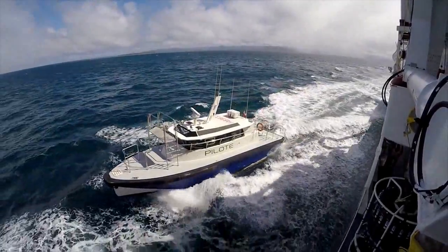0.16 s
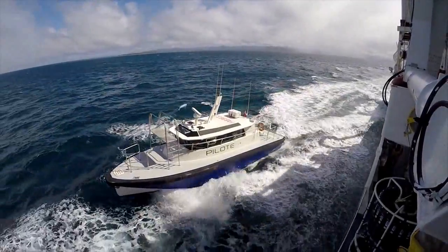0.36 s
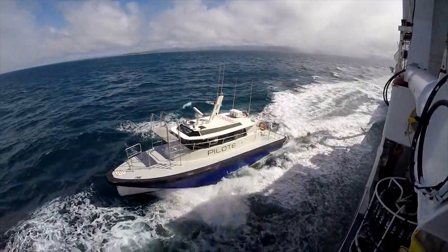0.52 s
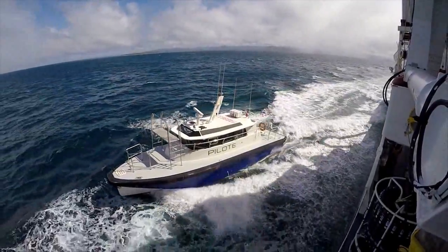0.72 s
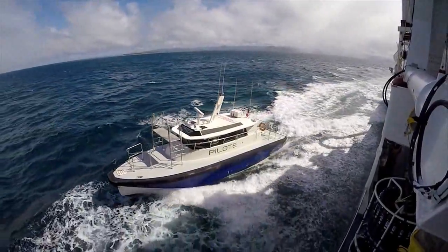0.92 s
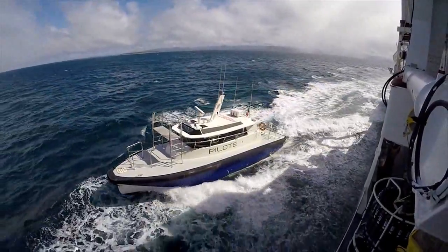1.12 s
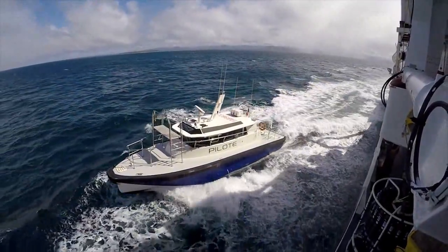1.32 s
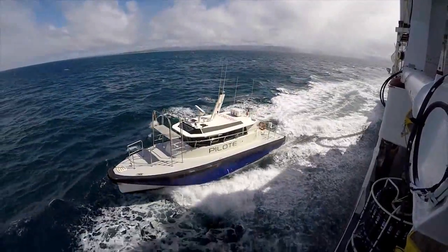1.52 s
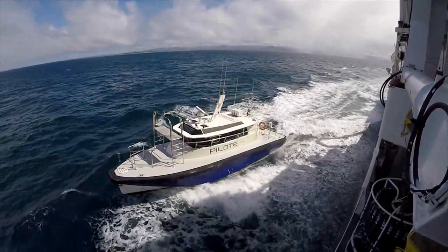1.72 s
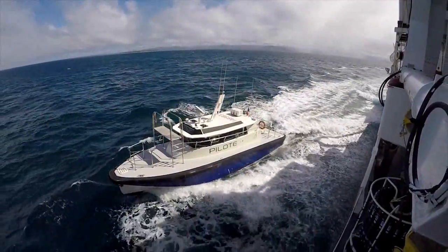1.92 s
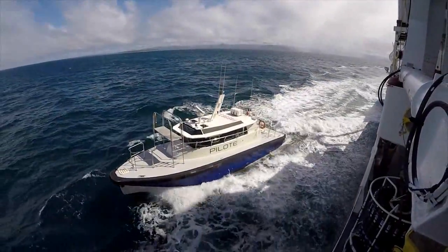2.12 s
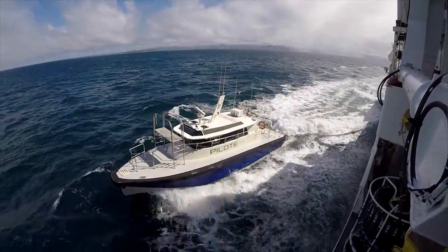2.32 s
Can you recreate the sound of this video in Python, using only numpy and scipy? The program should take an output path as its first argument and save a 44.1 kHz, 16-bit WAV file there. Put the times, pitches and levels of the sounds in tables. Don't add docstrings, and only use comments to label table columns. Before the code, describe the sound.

Continuous low marine engine drone dominates from start to end, its rasp rising and falling as waves cover the exhaust; quiet water hiss, faint ship hum and wind on the microphone, open sea, mono, dull treble.

```python
import sys
import numpy as np
from scipy import signal
from scipy.io import wavfile

SR = 44100
rng = np.random.default_rng(int(sys.argv[2]) if len(sys.argv) > 2 else 0)


def materialize(psi):
    bounded = np.clip(np.atleast_2d(psi).T, -1, 1)
    quanta = np.round(bounded * 32767).astype(np.int16)
    wavfile.write(sys.argv[1], SR, quanta)


def rack_gain(trim_db):
    fader = np.asarray(trim_db, float)
    return 10 ** (fader / 20)


N = 108177

CYCLE_HZ, CYLINDERS = 13.637, 6
FIRING_PHASE_RAD, OVERTONE_LEAD_RAD = -2.1, 1.2
# start_s, firing_db, second_db, third_db
EXHAUST_TONES = [(0.0, -18.5, -26, -24), (0.05, -16.5, -18, -22), (0.12, -17, -36, -16),
                 (0.18, -13.5, -15.5, -21), (0.35, -16.5, -18, -18), (0.46, -16.5, -18.5, -26.5),
                 (0.69, -17.5, -23, -24.5), (0.76, -17, -30, -41.5), (0.84, -14.5, -19.5, -22),
                 (1.0, -15, -17, -19.5), (1.15, -15.5, -19.5, -24), (1.62, -16.5, -17, -26),
                 (1.71, -14, -29, -31), (1.77, -16, -22.5, -23.5), (1.85, -14.5, -17.5, -23.5),
                 (2.22, -15, -22, -18.5), (2.39, -16, -16, -24), (2.45, -18, -16.5, -21)]


def rms_one(x):
    return x / np.sqrt(np.mean(x ** 2) + 1e-20)


def in_time(rows):
    time_s, *columns = np.transpose(rows)
    return [np.interp(np.arange(N) / SR, time_s, column) for column in columns]


def drift(hz):
    r = np.exp(-80 * np.pi * hz / SR)
    noise = rng.standard_normal(N // 40 + 2002)
    slow = signal.lfilter([1], [1, -2 * r, r * r], noise)[2000:]
    return np.interp(np.arange(N) / 40, np.arange(len(slow)), rms_one(slow - slow.mean()))


def band(x, low_hz, high_hz):
    sos = signal.butter(2, [low_hz, high_hz], "band", fs=SR, output="sos")
    return signal.sosfilt(sos, x)


def resonance(x, hz, width_hz):
    r = np.exp(-np.pi * width_hz / SR)
    zeros = np.array([1, 0, -1]) * (1 - r * r) / 2
    poles = [1, -2 * r * np.cos(2 * np.pi * hz / SR), r * r]
    return signal.lfilter(zeros, poles, x)


def banded(source, spectrum, patchy_db, tilt_db):
    hz_points, db_points = np.transpose(spectrum)
    octaves = np.log2(min(hz_points[-1], 14000) / hz_points[0])
    edges_hz = hz_points[0] * 2 ** np.arange(0, octaves, 1 / 3)
    out, shared = 0, drift(5.0)
    for k, low_hz in enumerate(edges_hz):
        centre_hz = low_hz * 2 ** (1 / 6)
        level_db = np.interp(np.log(centre_hz), np.log(hz_points), db_points)
        flicker_db = patchy_db * (0.44 * shared + drift(25.0))
        gain = rack_gain(level_db + tilt_db * k / len(edges_hz) + flicker_db)
        out = out + gain * band(source[k % 2], low_hz, low_hz * 2 ** (1 / 3))
    return rms_one(out)


def firing_tones(crank):
    firing = CYLINDERS * crank + FIRING_PHASE_RAD
    out = 0
    for k, level_db in enumerate(in_time(EXHAUST_TONES)):
        lead_rad = OVERTONE_LEAD_RAD + 0.25 * drift(2.6) if k else 0
        out = out + rack_gain(level_db) * np.cos((k + 1) * firing + lead_rad)
    return np.sqrt(2) * out


def uneven_orders(crank, outlet_db, rasp_db):
    # cycle_multiple, level_db
    uneven = [(4, -42), (5, -35), (9, -33), (11, -34), (13, -47), (14, -40), (15, -36), (16, -47),
              (17, -37), (19, -36), (21, -36), (22, -44), (23, -46), (24, -43), (27, -37), (28, -44),
              (29, -41), (30, -42), (31, -50), (33, -48), (35, -50), (40, -45), (43, -52), (46, -55),
              (48, -55), (52, -51), (57, -54), (58, -55), (61, -55), (64, -56)]
    firing = CYLINDERS * crank + FIRING_PHASE_RAD
    out = 0
    for order, level_db in uneven:
        order, loose_rad, slip = round(order), rng.uniform(0, 2 * np.pi), drift(2.27)
        follows_db = 0.89 * rasp_db if order > 24 else 0.22 * outlet_db
        if order % 3:
            phase = order * crank + loose_rad + 0.8 * slip
        else:
            phase = order // 3 * (firing / 2 + np.pi) + OVERTONE_LEAD_RAD + 0.8 * slip
        wander_db = 1.8 * drift(3.0)
        out = out + rack_gain(level_db + follows_db + wander_db) * np.cos(phase)
    return np.sqrt(2) * out


def roar(crank, rasp_db):
    # freq_hz, density_db (per Hz)
    gas_spectrum = [(60, 0), (100, 0), (200, -4.5), (330, -3.5), (450, -10.5), (620, -14.5), (850, -18.5),
                    (1300, -35.5)]
    puffs = 1 + 0.8 * np.cos(CYLINDERS * crank + FIRING_PHASE_RAD)
    noise = banded(rng.standard_normal((2, N)) * puffs, gas_spectrum, patchy_db=0.0, tilt_db=7.5)
    return rack_gain(-31 + 0.31 * rasp_db) * noise


def pops():
    # start_s, peak_db
    strong_pops = [(.488, -27), (.562, -31), (1.149, -31), (1.295, -30), (1.369, -29), (1.442, -33),
                   (1.588, -30), (1.808, -30), (1.882, -22), (1.955, -25), (2.248, -31), (2.395, -31)]
    first_s, plain_db, trim_db = 0.048, -40, -2
    pipe_hz, width_hz = 788.5, 49
    hold_s, pop_t60_s, crack_t60_s = 0.012, 0.18, 0.03
    starts_s = first_s + np.arange(int(N / SR * CYCLE_HZ)) / CYCLE_HZ
    levels_db = plain_db + 1.25 * rng.standard_normal(len(starts_s))
    for start_s, peak_db in strong_pops:
        levels_db[np.argmin(abs(starts_s - start_s))] = peak_db + trim_db

    age_s, out = np.arange(SR // 8) / SR, np.zeros(N + SR)
    attack = np.minimum(age_s * 1000, 1)
    shape = attack * rack_gain(-60 * np.maximum(age_s - hold_s, 0) / pop_t60_s)
    ring = np.sin(2 * np.pi * pipe_hz * age_s)
    crack = ring * rack_gain(-60 * age_s / crack_t60_s)
    for start_s, level_db in zip(starts_s, levels_db):
        noise = resonance(rng.standard_normal(len(age_s)), pipe_hz, width_hz)
        noise = resonance(noise, pipe_hz, 420)
        tone = crack + 0.44 * ring + 0.33 * rms_one(noise)
        i = int(start_s * SR)
        out[i:i + len(age_s)] += rack_gain(level_db) * shape * tone
    return out[:N]


def wash():
    # start_s, level_db
    wash_level = [(0, -42.5), (.2, -42.5), (.36, -41.5), (.55, -42), (.65, -40.5), (.85, -41.5),
                  (1.1, -42.5), (1.2, -42.5), (1.4, -44), (1.6, -42), (1.85, -41.5), (1.99, -41.5),
                  (2.1, -43), (2.3, -41.5), (2.45, -41.5)]
    # freq_hz, density_db (per Hz)
    spray_spectrum = [(590, -28), (1000, -1), (1570, -4), (2710, -3.5), (3470, -10.5), (3880, -11.5),
                      (4260, -9.5), (5500, -9), (11600, -21.5), (15100, -31), (22000, -120)]
    # freq_hz, width_hz, gain_db
    housing = [(1905, 102, 5.5), (2765, 640, 3.5), (3350, 400, -1), (3885, 233, 8), (5500, 520, 1.5)]
    drops_per_s, drops_db = 1300, -11
    level_db, = in_time(wash_level)
    falls = rng.random((2, N)) < drops_per_s / SR
    sizes = rack_gain(4.4 * np.minimum(rng.exponential(1, (2, N)), 5))
    drops = falls * sizes * rng.choice([-1, 1], (2, N))
    source = rng.standard_normal((2, N)) + rack_gain(drops_db) * rms_one(drops)
    hiss = banded(source, spray_spectrum, patchy_db=0.5, tilt_db=level_db - level_db.mean())
    for freq_hz, width_hz, gain_db in housing:
        hiss = hiss + (rack_gain(gain_db) - 1) * resonance(hiss, freq_hz, width_hz)
    return rack_gain(level_db + 2.0) * rms_one(hiss)


def ship_hum():
    level_db = -35 + 2.0 * drift(3.0)
    return np.sqrt(2) * rack_gain(level_db) * np.sin(2 * np.pi * 37.6 * np.arange(N) / SR)


def wind():
    rumble = band(rng.standard_normal(2 * N), 26, 60)[N:]
    return rack_gain(-34 + 1.5 * drift(5.2)) * rms_one(rumble)


def scene():
    # start_s, level_db
    rasp_level = [(0.0, -38.5), (0.12, -41.5), (0.2, -32), (0.7, -39), (0.73, -45), (0.87, -35.5),
                  (1.43, -40), (1.47, -31), (1.74, -38), (1.77, -30), (2.03, -34.5), (2.05, -34.5),
                  (2.31, -37), (2.45, -34)]
    crank = 2 * np.pi * (CYCLE_HZ * np.arange(N) / SR + 0.006 * drift(1.04))
    _, second_db, third_db = in_time(EXHAUST_TONES)
    outlet_db = (second_db + third_db) / 2
    outlet_db = outlet_db - outlet_db.mean()
    rasp_db, = in_time(rasp_level)
    rasp_db = rasp_db - rasp_db.mean()
    engine = firing_tones(crank) + uneven_orders(crank, outlet_db, rasp_db)
    exhaust = engine + roar(crank, rasp_db) + pops()
    return (exhaust + wash() + ship_hum() + wind())[None]


def roll_off(x):
    return signal.sosfilt(signal.butter(12, 11800, fs=SR, output="sos"), x)


def record(dry):
    return roll_off(dry)


dry = scene()
out = record(dry)
materialize(out)
```